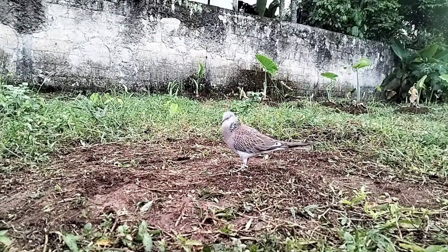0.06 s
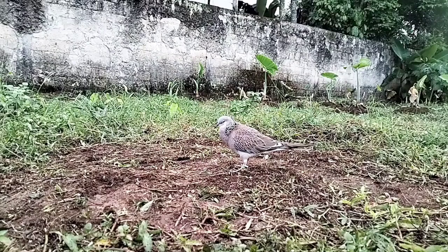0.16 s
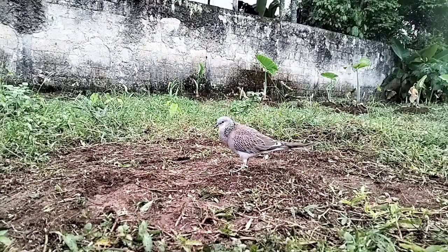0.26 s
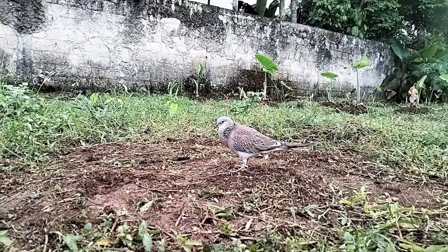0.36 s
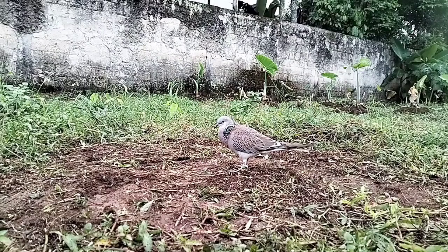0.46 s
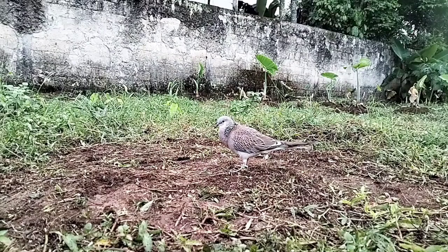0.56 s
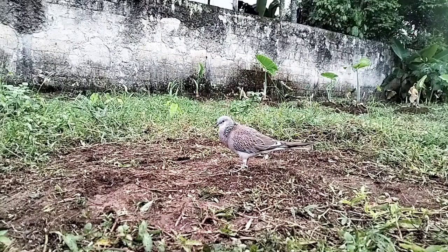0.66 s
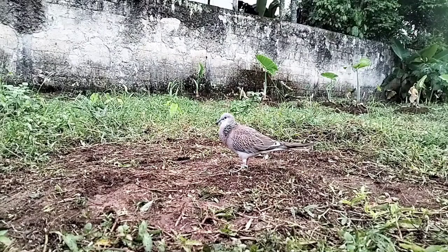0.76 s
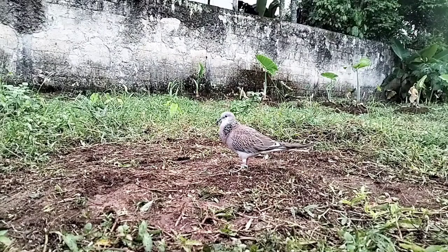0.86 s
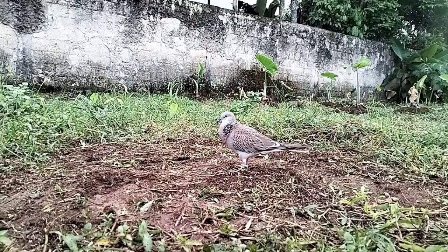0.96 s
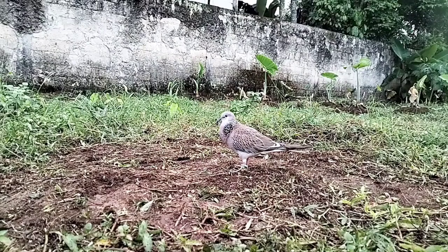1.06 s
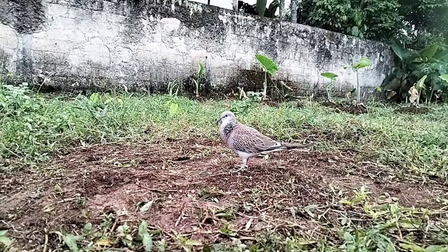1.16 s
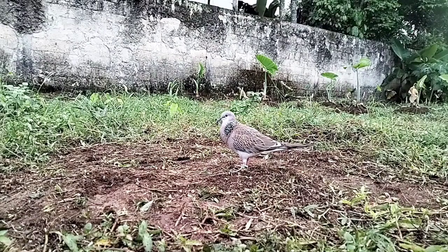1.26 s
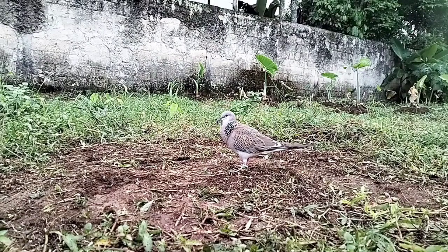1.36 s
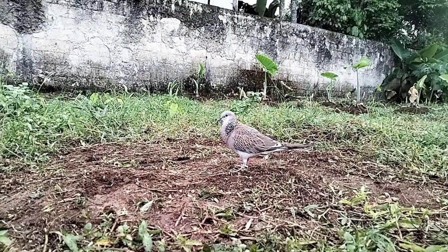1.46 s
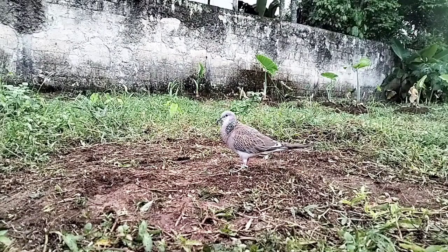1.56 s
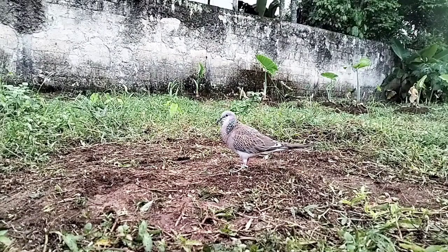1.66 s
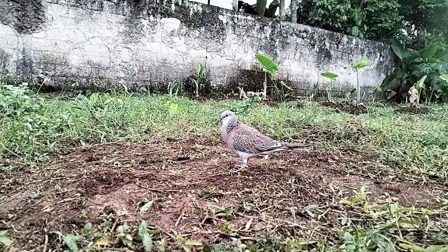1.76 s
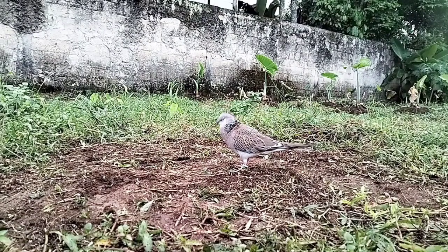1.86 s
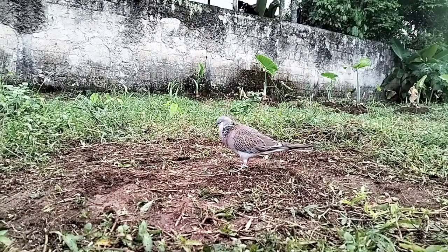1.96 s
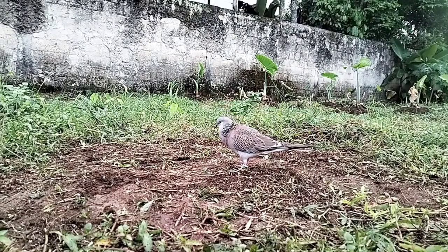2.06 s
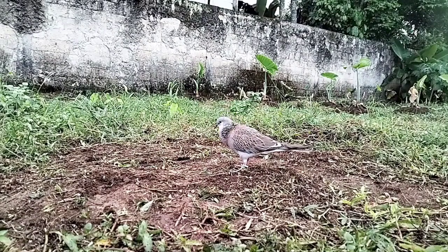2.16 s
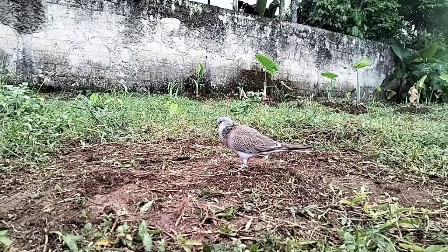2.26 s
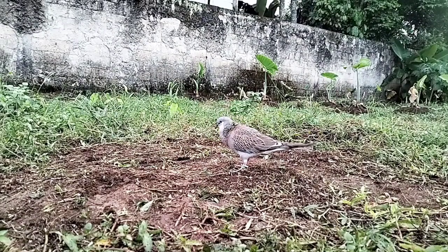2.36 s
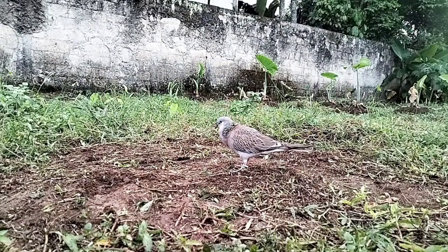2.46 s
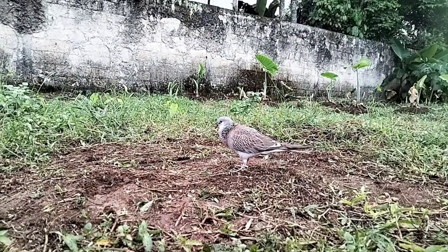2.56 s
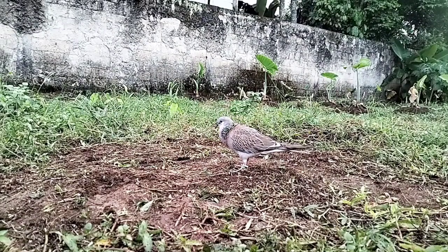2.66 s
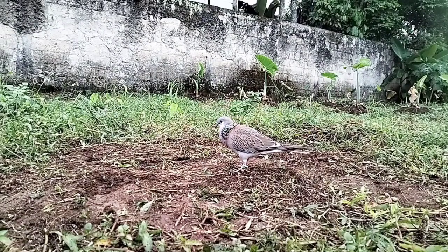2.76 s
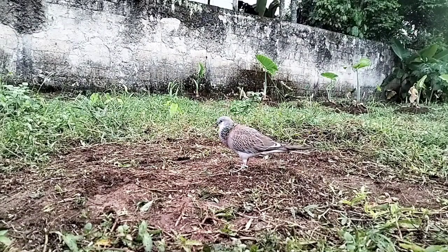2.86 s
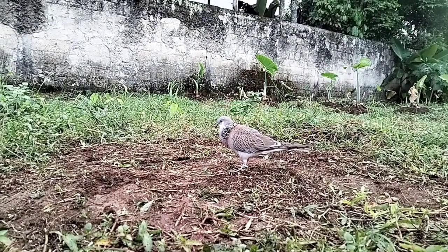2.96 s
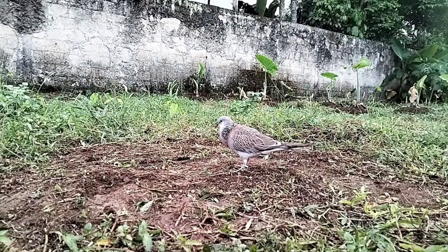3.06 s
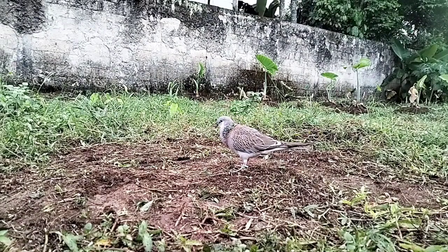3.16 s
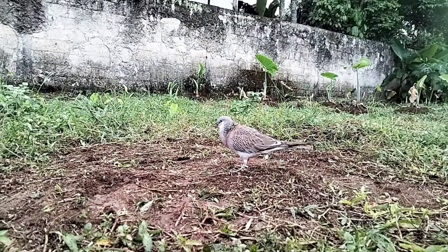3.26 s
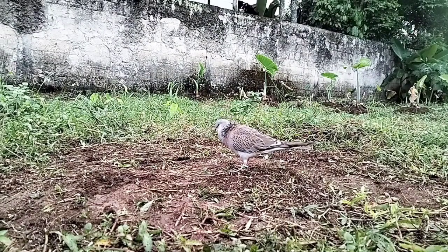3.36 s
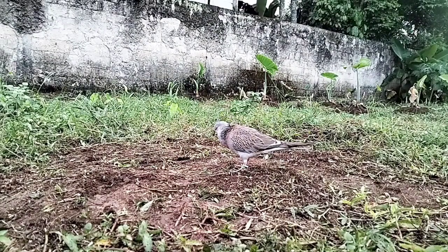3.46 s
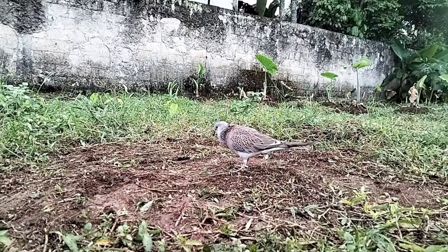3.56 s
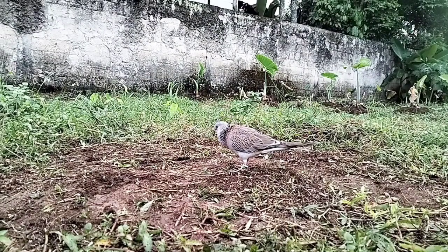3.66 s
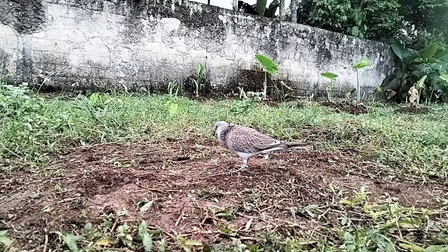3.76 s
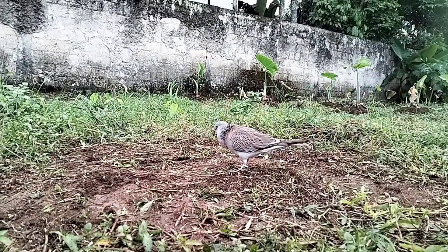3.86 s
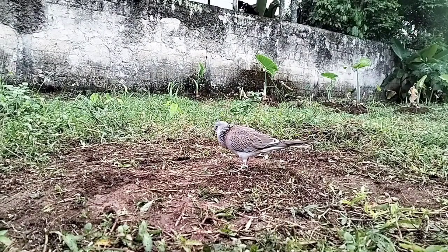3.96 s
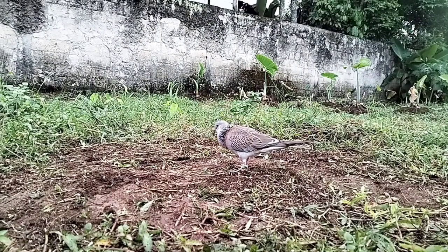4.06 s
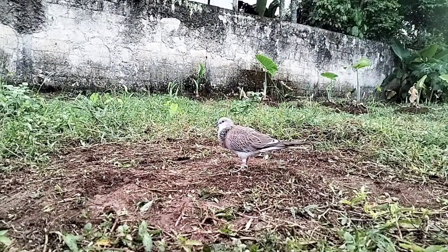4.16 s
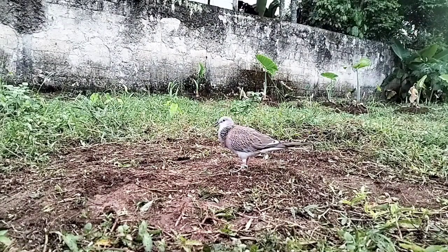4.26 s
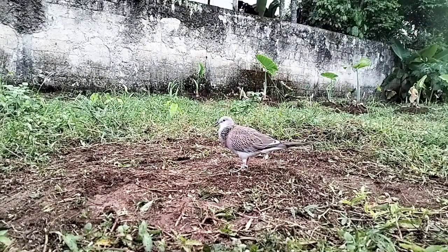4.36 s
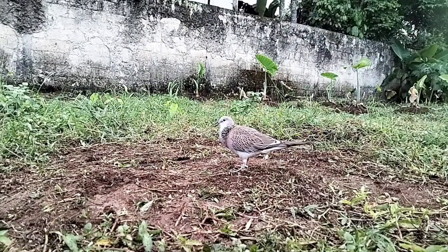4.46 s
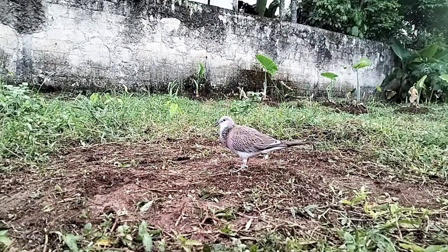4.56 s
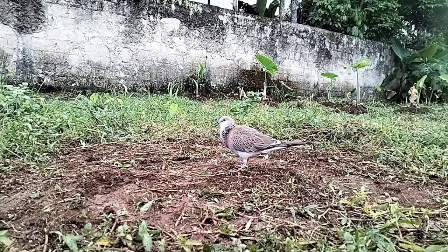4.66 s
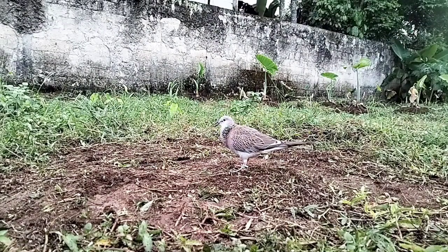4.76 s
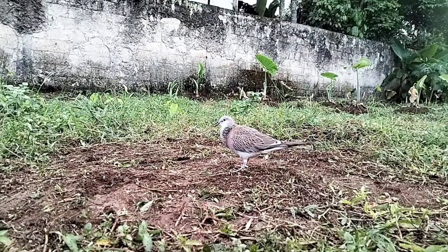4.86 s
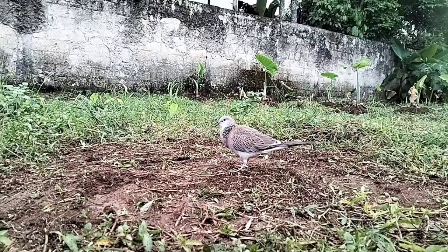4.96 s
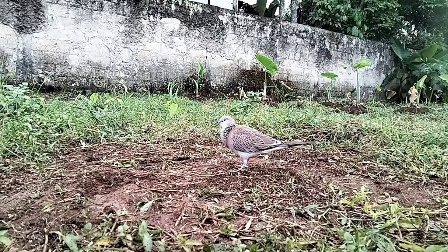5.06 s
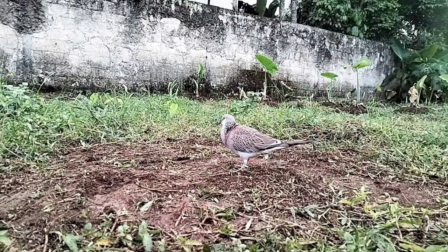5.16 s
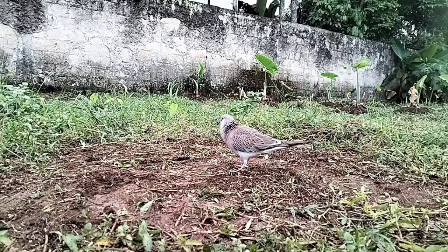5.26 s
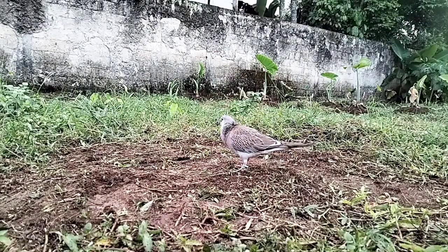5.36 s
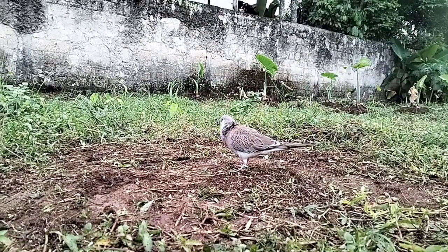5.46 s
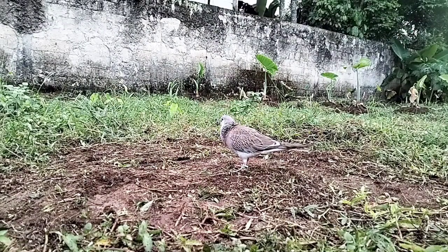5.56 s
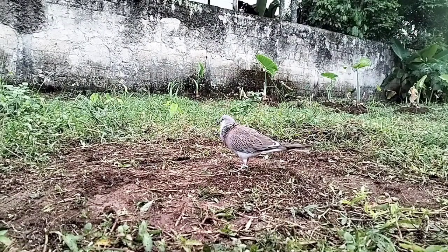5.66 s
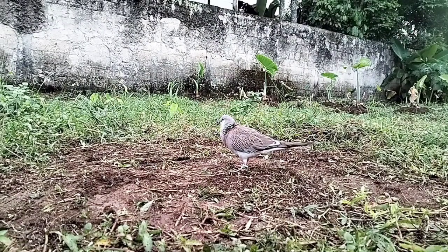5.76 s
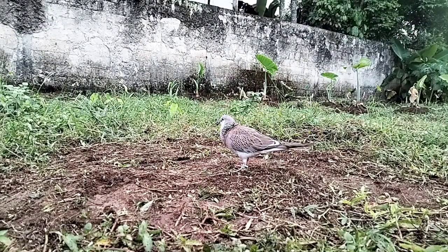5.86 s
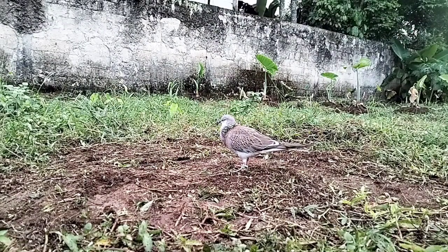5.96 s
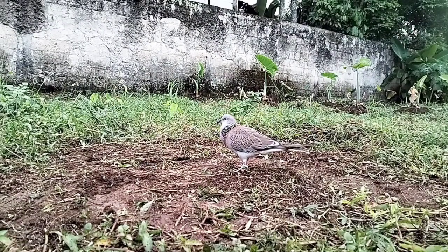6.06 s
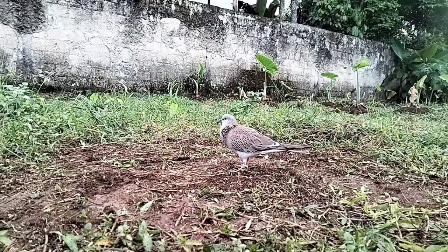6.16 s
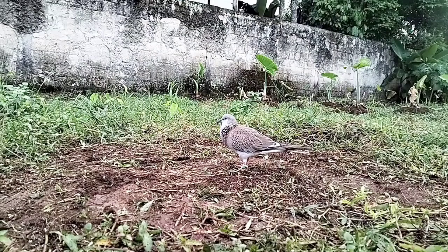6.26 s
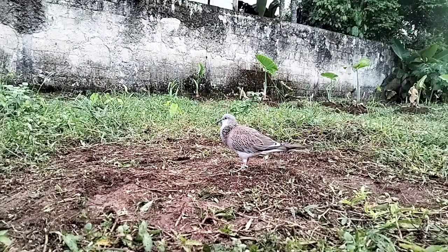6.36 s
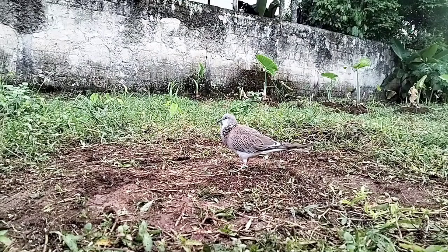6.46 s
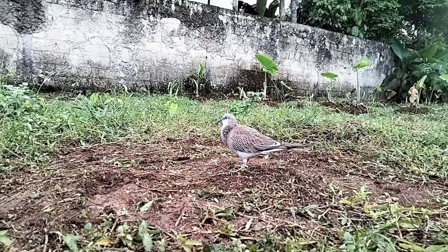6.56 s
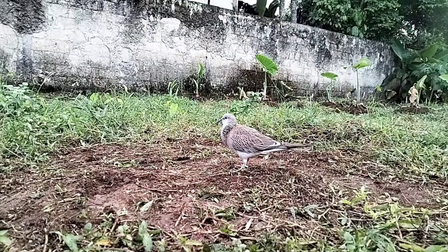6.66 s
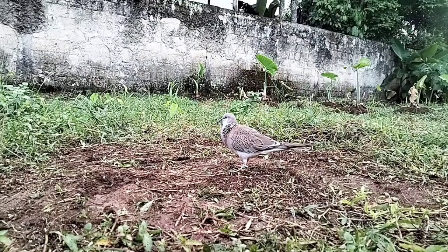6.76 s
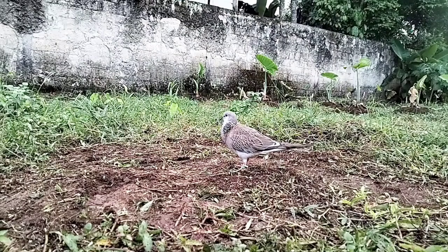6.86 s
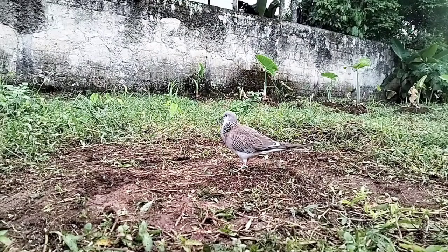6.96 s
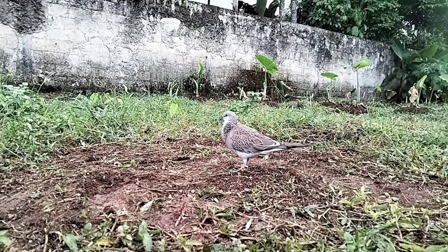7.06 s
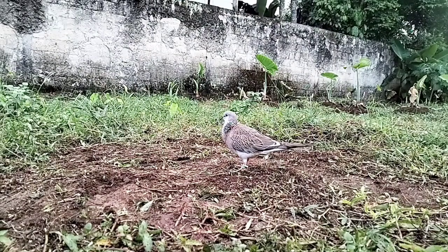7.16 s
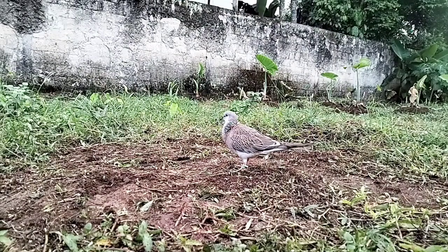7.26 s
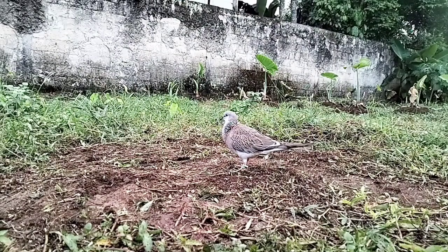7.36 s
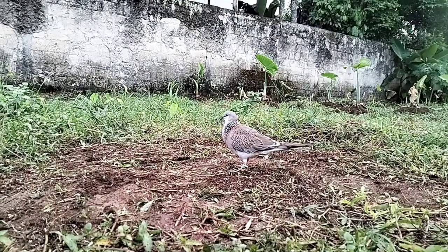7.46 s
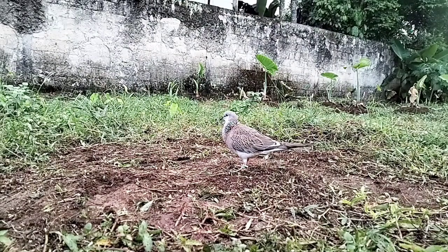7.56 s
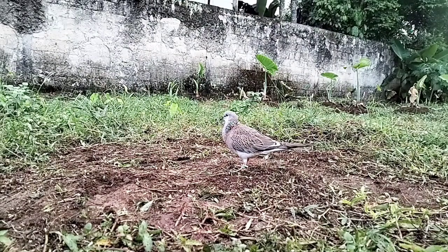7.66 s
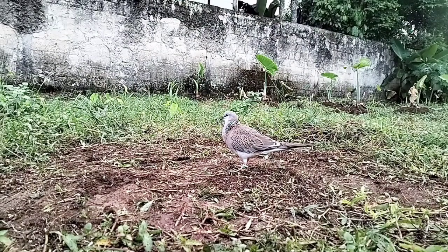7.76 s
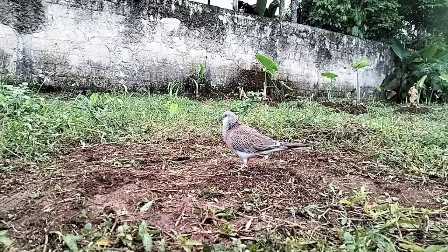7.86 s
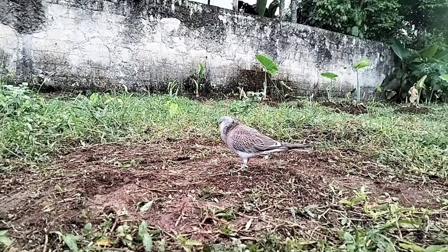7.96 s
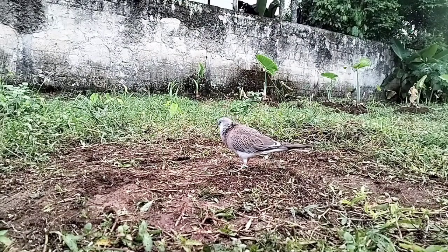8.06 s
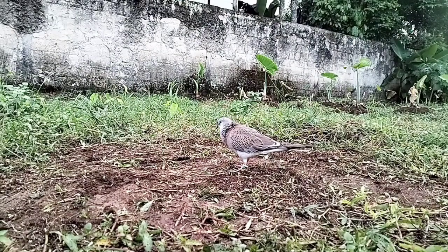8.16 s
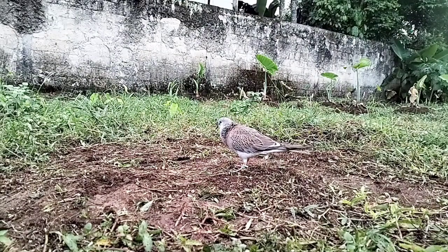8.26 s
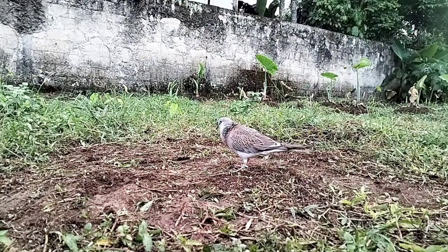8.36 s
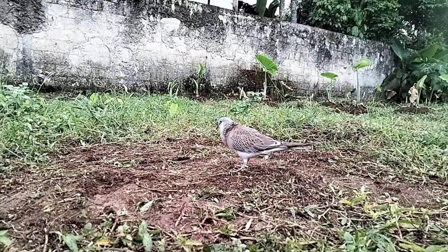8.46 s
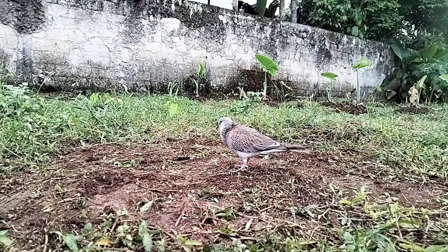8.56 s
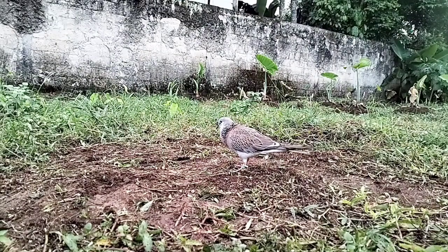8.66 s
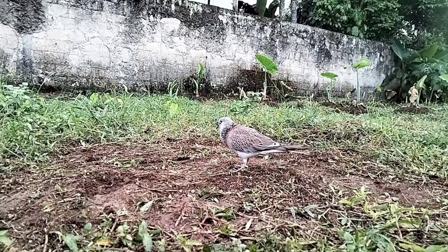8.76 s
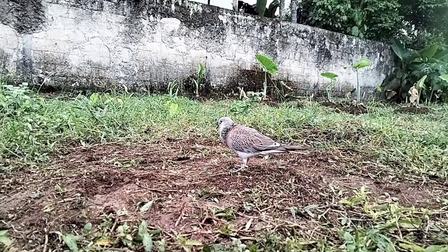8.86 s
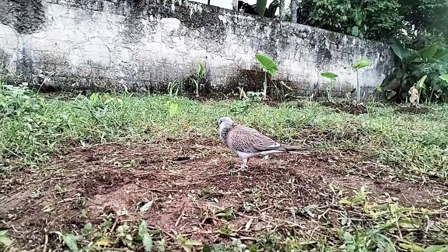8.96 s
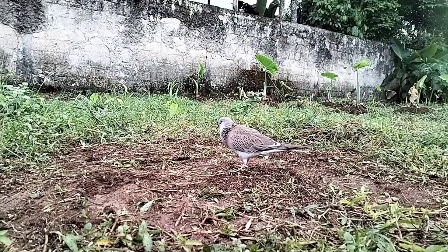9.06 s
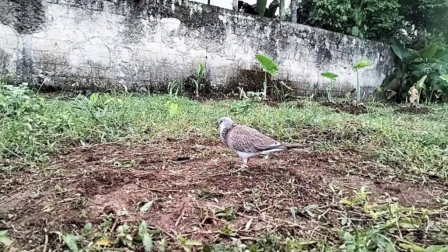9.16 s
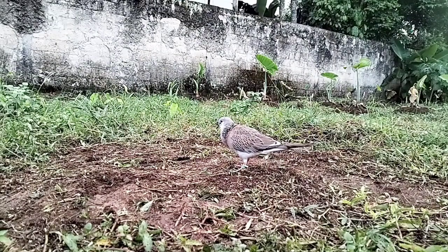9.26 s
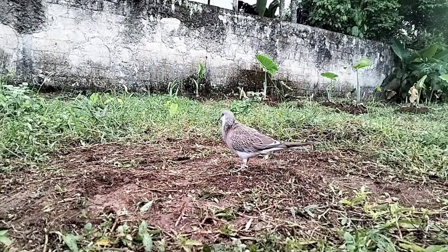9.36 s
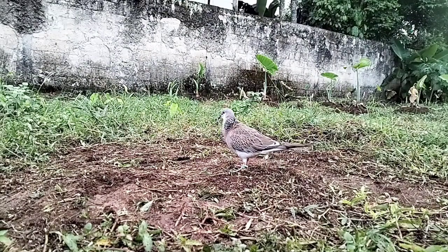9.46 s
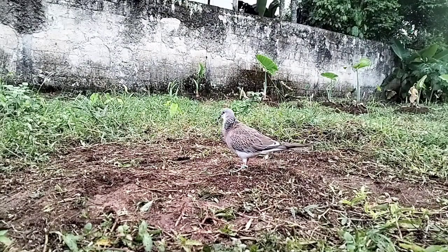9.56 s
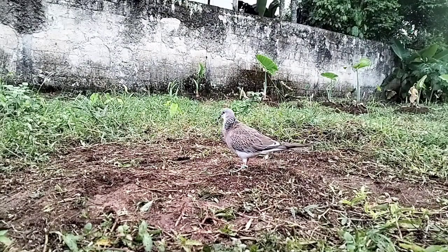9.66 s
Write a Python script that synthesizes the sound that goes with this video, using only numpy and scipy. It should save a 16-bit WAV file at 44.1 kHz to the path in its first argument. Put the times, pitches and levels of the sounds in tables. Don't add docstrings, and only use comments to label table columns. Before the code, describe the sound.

Outdoors by a garden wall, one near dove repeats a mellow, flute-like coo, short then higher and rising, followed by a pulsing purr that drops in pitch. Quieter, slightly higher doves overlap and fill the gaps. Underneath are thin chirps, faint cricket buzzes, tiny litter snaps, leaf hiss and steady far traffic and engine hum. The dove stays close and dry, with only slight outdoor echo.

```python
import sys
import numpy as np
from scipy import signal
from scipy.io import wavfile
from scipy.ndimage import uniform_filter1d, minimum_filter1d

SR = 44100
rng = np.random.default_rng(int(sys.argv[2]) if len(sys.argv) > 2 else 0)


def gain_from_db(level_db):
    decades = np.asarray(level_db, float) / 20
    return 10 ** decades


def waveform_to_disk(signal):
    frames = np.transpose(np.atleast_2d(signal))
    scaled = np.clip(frames, -1, 1) * 32767
    samples = np.round(scaled).astype(np.int16)
    wavfile.write(sys.argv[1], SR, samples)


N = 427769
TIME = np.arange(N) / SR

# length_share, pitch_ratio (re top), level_db (re top)
SHORT_FORM = [(0, .68, -22), (.1, .8, -12), (.22, .95, -4), (.36, 1, 0), (.5, .98, -1), (.65, .92, -6),
              (.82, .84, -14), (1, .74, -24)]
RISING_FORM = [(0, .69, -29), (.15, .745, -20), (.3, .82, -13.5), (.43, .895, -6), (.54, .96, -.7),
               (.68, 1, 0), (.93, .995, 0), (.975, .93, -3), (1, .72, -22)]
# start_s, length_s, top_pitch_hz, top_level_db
NEAR_SHORT = [
    (0.087, 0.099, 542, -14),
    (1.891, 0.1, 566, -10),
    (3.374, .098, 566, -9.5),
    (5.292, .11, 543, -13),
    (7.943, 0.081, 578, -9),
]
NEAR_RISING = [
    (0.289, 0.2, 679, -2),
    (2.08, 0.19, 671.5, -1.5),
    (3.57, 0.17, 660.3, -2.5),
    (5.488, .19, 668.3, -1.5),
    (8.129, 0.21, 668, -2.5),
]
# start_s, length_s, peak_db
PUFFS = [
    [(.685, 0.028, -8.5), (.74, 0.032, -6.5), (.783, .01, -15.5), (.796, .024, -5.5), (.83, .024, -4.5),
     (.864, .021, -8.5), (.893, 0.017, -15), (.918, .012, -15.5)],
    [(2.465, .024, -8.5), (2.512, 0.024, -6.5), (2.553, 0.026, -5.5), (2.592, 0.022, -7),
     (2.625, 0.018, -7), (2.653, .013, -7.5), (2.676, 0.012, -10), (2.693, 0.013, -13), (2.712, .01, -13.5)],
    [(3.943, 0.02, -9), (3.99, 0.025, -8), (4.028, .032, -8), (4.07, 0.018, -8.5), (4.098, 0.011, -6),
     (4.12, 0.018, -8), (4.142, 0.0079, -9), (4.16, 0.0062, -8)],
    [(5.875, 0.024, -9.5), (5.927, 0.018, -7.5), (5.96, 0.0066, -4), (5.971, .02, -7.5), (6.002, 0.016, -7),
     (6.031, 0.014, -7), (6.056, 0.012, -7.5), (6.079, 0.011, -7.5), (6.098, 0.01, -9),
     (6.115, 0.0077, -13)],
    [(8.528, .023, -8.5), (8.577, 0.023, -7), (8.612, 0.023, -7), (8.647, 0.012, -7), (8.668, .015, -7),
     (8.693, .017, -7), (8.719, .013, -10.5), (8.74, 0.011, -7.5), (8.758, 0.0063, -11),
     (8.777, 0.0052, -10)],
]
# first_puff_s, last_puff_s, first_puff_db, trill_top_hz, fall_lateness (power)
ROLLS = [
    (0.94, 1.031, -18.5, 731, 1),
    (2.729, 2.83, -17, 719.4, .94),
    (4.177, 4.301, -10.5, 705, 1.41),
    (6.133, 6.259, -13.5, 713, .95),
    (8.792, 8.951, -13.5, 721, 0.91),
]
ROLL_PUFFS, OVERTONES = [5, 7, 9, 9, 11], [7, 7, 8, 7, 7]
# level of that overtone at the top, overtone_db
OVERTONE_DB = [-49, -64, -51, -50, -60]
TRILL_FALL = [(0, .985), (0.141, 1.0), (0.449, 0.93), (.7, 0.783), (1, 0.64)]
# centre_hz, width_hz, level_db
WINDPIPE = [(3460, 120, -60.5), (5340, 70, -56.5)]
OCTAVE_DB = -53
THROB_PER_S = 56
SADDLE_DB = 4.5
ROLL_END_DB, ROLL_FADE_POWER = -28, 1.045
ROLL_OPEN_SHARE, ROLL_HURRY = 0.6, .06
ROLL_JITTER_S, ROLL_JITTER_DB = 0.002, 2.0

# length_share, pitch_ratio, level_db
ARCHED_FORM = [(0, .72, -17), (.3, .83, -7), (.5, .96, -2), (.65, 1, 0), (.8, .985, 0), (.9, .93, -1.5),
               (.96, .84, -6), (1, .7, -23)]
# start_s, length_s, top_pitch_hz, top_level_db
FAR_SHORT = [(.55, 0.13, 656, -46), (1.43, 0.1, 699, -24), (3.21, 0.11, 684, -27), (5.3, 0.075, 686, -22.5),
             (6.62, 0.083, 632, -32), (6.79, 0.097, 697, -24), (9.15, 0.093, 624, -30),
             (9.6, 0.13, 691, -32.5)]
FAR_RISING = [(1.04, .18, 782, -28.5), (1.61, 0.15, 774, -18.5), (1.76, 0.09, 734, -23.5),
              (3.41, 0.17, 814, -30), (3.82, 0.16, 772, -27), (4.16, 0.13, 777, -17),
              (5.45, 0.087, 791, -29.5), (5.66, 0.17, 830, -29.5), (6.33, 0.1186, 723, -27),
              (6.87, 0.16, 731, -26.5), (6.985, 0.13, 775, -18), (8.14, 0.1, 807, -31),
              (9.39, 0.2, 736, -26.5)]
# start_s, length_s, top_pitch_hz, last_pitch_hz, level_db
FAR_TRILLS = [
    (1.329, .39, 764, 703, -33.5),
    (1.965, 0.41, 750, 584, -22.5),
    (3.739, 0.1, 758, 682, -30),
    (4.31, 0.19, 753, 740, -23.5),
    (4.485, 0.38, 734.4, 556, -22.5),
    (6.201, 0.22, 719.4, 680, -30),
    (7.235, 0.116, 771, 752, -23.5),
    (7.35, 0.42, 753, 533, -22),
    (8.362, 0.64, 760, 679, -34),
]
HIGH_TRILLS = [
    (0, 0.38, 802, 686, -28.5),
    (2.423, 0.46, 815.8, 712, -31),
    (4.69, .45, 804, 614, -28.5),
    (7.607, 0.44, 797, 673, -27),
]
FAR_FALL_POWER, FAR_MELT_SHARE = 2.2, .9
FAR_LOUDEST_SHARE, FAR_SWELL_DB = .3, 22
FAR_JITTER = .016

# start_s, level_db, pitch_ratio
CHIPS = [(0.826, -39, 0.95), (1.605, -39.5, 0.96), (3.127, -39, 0.94), (3.833, -39, 0.97), (5.8, -42, 0.94),
         (7.89, -40, 0.96), (8.54, -39, 0.96)]
# late_s, length_s, top_pitch_hz, end_drop_hz, top_share (of the length)
STROKES = [
    (.002, 0.015, 3475, 870, 0.34),
    (.03, 0.052, 3770, 1406, .44),
]
# start_s, length_s, first_pitch_hz, last_pitch_hz, level_db
WHISTLE = [(0.575, 0.33, 4410, 4220, -57.5), (1.273, 0.5, 4380, 4170, -64), (2.929, 0.22, 4280, 4350, -60),
           (3.588, 0.33, 4165, 4200, -59), (4.314, 0.14, 4580, 4420, -65), (5.4, 0.12, 4100, 4110, -71),
           (5.602, 0.37, 4190, 4100, -62.5), (7.655, 0.35, 4250, 4280, -61.5),
           (8.184, 0.48, 4270, 4000, -58.5)]
BUZZ_ENDS = [0.724, 1.858, 2.97, 4.1, 5.222, 6.348, 7.48, 8.603, 9.729]
# re_end_s, strokes_per_s, level_db
BUZZ = [(-.57, 185.7, -74), (-.5, 180.5, -68), (-.4, 178.1, -63), (-.2, 166.5, -59.5), (-.005, 155, -59.5),
        (0, 151, -76.5)]
# start_s, peak_db
TICKS = [(0.6585, -67), (0.9198, -47), (1.3877, -52), (2.4095, -73), (2.4424, -59), (2.473, -48),
         (3.2266, -67), (3.3248, -67), (3.3717, -67), (4.072, -54), (5.3497, -58), (5.8279, -54),
         (6.1434, -50), (6.256, -48), (6.5735, -68), (7.2893, -55), (7.4719, -55), (7.8965, -57),
         (8.0541, -63), (8.756, -54), (8.8398, -54), (8.933, -49), (9.1102, -60), (9.2174, -68),
         (9.3147, -66), (9.6205, -66)]
# start_s, length_s, pitch_hz, level_db
DISTANT = [
    (6.1, .17, 1240, -53),
    (6.38, .24, 1020, -49),
    (6.1, .25, 2900, -63),
    (9.3, .39, 128, -25),
    (7.4, .5, 178, -31),
    (8.35, .4, 160, -28),
    (9.0, .3, 167, -29),
    (.5, .15, 1050, -52),
    (3.78, .08, 5050, -65),
    (3.12, .06, 5050, -65),
]

# time_s, firing_rate_hz, level_db
ENGINE = [(0.0, 34.44, -37), (4.51, 32.36, -30.5), (7.559, 34.31, -29.5), (8.938, 40.18, -28),
          (9.7, 39.83, -41)]
# multiple, level_db
ORDERS = [(3, -8.5), (4, -3.5), (5, -1.5), (6, -7.5), (7, -17.5)]
# time_s, pitch_hz, level_db
TRUCK = [(0, 68, -41.5), (2.401, 66, -28.5), (2.801, 64, -41), (3.3, 65, -27.5), (3.8, 63, -38),
         (4.4, 65.5, -29), (6.151, 67, -30.5), (6.5, 66, -38.5), (7.7, 66.5, -33), (9.7, 66, -30.5)]
# band_hz, level_db (per Hz)
RUMBLE = [(13, -42), (22, -7), (70, 2.5), (157, 4.5), (182, -5), (266, -8), (395, -14.5), (554, -18.5),
          (669, -20.5), (708, -17.5), (856, -26), (1270, -32.5), (2000, -62.5), (2600, -85), (4400, -120)]
# time_s, level_db
TRAFFIC = [(0, -9.5), (1.3, -1.5), (2.5, 5.5), (3.5, -1.8), (4.56, 0), (5.1, 1), (5.8, 0.5), (8.3, -2),
           (9.7, -4.5)]
DEEP_DB, UPPER_DB, UPPER_FOLLOWS = -28, -26, 0.28
# band_hz, level_db (per Hz)
RUSTLE = [(1060, -29), (1800, -16), (2140, -7.5), (2900, 0.5), (4100, -0.5), (4750, -8.5), (6500, -13.5),
          (8800, -20), (11500, -30), (15700, -25)]
# time_s, level_db
BREEZE = [(0, -52), (0.701, -58), (1.2, -50.5), (2.619, -52), (4.3, -57), (5.75, -52.5), (6.5, -55),
          (8.2, -57), (9.7, -57.5)]
# centre_hz, width_hz, level_db
CHORUS = [(7415, 830, -65.5), (10200, 1100, -67.5)]
# centre_s, half_width_s
DROPOUTS = [(.558, .006), (.577, .003), (.63, .005), (.652, .006), (6.7, .008)]
# delay_s, level_db
ECHOES = [(.006, -25.5), (.013, -9.5), (.031, -17.5), (.058, -21), (.094, -31)]


def drift(rate):
    r = np.exp(-2 * np.pi * rate / SR)
    slow = signal.lfilter([1], [1, -2 * r, r * r], rng.standard_normal(N + SR))[SR:]
    return slow / slow.std()


def add(out, start_s, sound):
    at = round(start_s * SR)
    out[at:at + len(sound)] += sound[:max(N - at, 0)]


def played(rows, fade_s):
    s, *columns = np.transpose(rows)
    t = np.arange(s[0], s[-1], 1 / SR)
    to_end_s = np.minimum(t - s[0], s[-1] - t)
    fade = np.sin(np.pi / 2 * np.clip(to_end_s / fade_s, 0, 1)) ** 2
    return t, fade, [np.interp(t, s, c) for c in columns]


def phase(hz):
    return 2 * np.pi * np.cumsum(hz) / SR


def follow(rows):
    s, *columns = np.transpose(rows)
    return [np.interp(TIME, s, c) for c in columns]


def echoed(x, wet_db):
    out = x.copy()
    for delay_s, level_db in ECHOES:
        add(out, delay_s, gain_from_db(level_db + wet_db) * x)
    return out


def scattered(x, wet_db, t60):
    t = np.arange(0, t60, 1 / SR)
    tail = rng.standard_normal(len(t)) * gain_from_db(-60 * t / t60)
    tail = tail / np.sqrt(np.sum(tail ** 2))
    return x + gain_from_db(wet_db) * signal.fftconvolve(x, tail)[:N]


def coo(hz, gain, octave_db=OCTAVE_DB, windpipe=WINDPIPE):
    turn = phase(hz)
    high = 0
    for centre_hz, width_hz, db in windpipe:
        for k in range(4, 10):
            high = high + gain_from_db(db) * np.exp(-((k * hz - centre_hz) / width_hz) ** 2) * np.sin(k * turn)
    octave = gain_from_db(octave_db) * gain ** 0.019 * np.sin(2 * turn)
    return gain * np.sin(turn) + octave + gain ** 2 * high


def dove_notes(form, sung, wobble, flutter_db, octave_db=OCTAVE_DB):
    out = np.zeros(N)
    tremor = .7 * drift(46) + np.sin(phase(THROB_PER_S * (1 + .15 * drift(20))))
    for s, length, top_hz, top_db in sung:
        t, fade, (ratio, db) = played(np.array(form) * [length, 1, 1], 0.0024)
        ratio, db = uniform_filter1d([ratio, db], size=150, mode="nearest")
        softness = np.clip(.03 - db / 15, 0, 1)
        shake = np.roll(tremor, -round(s * SR))[:len(t)] * softness
        hz = top_hz * ratio * (1 + wobble * shake)
        add(out, s, coo(hz, fade * gain_from_db(top_db + db + flutter_db * shake), octave_db))
    return out


def rolled(first_s, last_s, first_db, count):
    share, chance = np.linspace(0, 1, count), rng.standard_normal((count, 2))
    hurried = share + ROLL_HURRY * share * (1 - share)
    s = first_s + (last_s - first_s) * hurried + ROLL_JITTER_S * share * chance[:, 0]
    db = first_db + (ROLL_END_DB - first_db) * share ** ROLL_FADE_POWER
    db = db + ROLL_JITTER_DB * share * chance[:, 1]
    return list(zip(s, ROLL_OPEN_SHARE * np.gradient(s), db))


def near_trill(edge_s=0.009, sag=.34, flat=.45, ripple_db=0.3):
    out, ripple = np.zeros(N), drift(36)
    for slow, roll, count, k, overtone_db in zip(PUFFS, ROLLS, ROLL_PUFFS, OVERTONES, OVERTONE_DB):
        first_s, last_s, first_db, top_hz, late = roll
        start = slow[0][0]
        for s, length, peak_db in slow + rolled(first_s, last_s, first_db, count):
            t = np.arange(0, length + edge_s, 1 / SR)
            share = t / t[-1]
            edges = np.sin(np.pi / 2 * np.clip(np.minimum(t, t[-1] - t) / edge_s, 0, 1)) ** 2
            saddle_db = SADDLE_DB * (s > start) * np.clip(length / .016 - .6, 0, 1)
            saddle_db = saddle_db * np.sin(np.pi * share ** .85) ** 4
            gain = edges * gain_from_db(peak_db + 5.5 - saddle_db + ripple_db * ripple[round(s * SR):][:len(t)])
            fallen = ((s - start) / (last_s - start)) ** late
            held_hz = top_hz * np.interp(fallen, *np.transpose(TRILL_FALL))
            arch = np.abs(np.sin(np.pi * share ** 0.92)) ** flat
            hz = held_hz * (1 + sag * (arch - .95))
            overtone = gain_from_db(overtone_db + 4) * gain ** 3 * (held_hz / top_hz) ** 12
            overtone = overtone * np.sin(k * phase(.8 * held_hz + .2 * hz))
            add(out, s - edge_s / 2, coo(hz, gain, windpipe=WINDPIPE[:1]) + overtone)
    return out


def near_dove():
    song = dove_notes(SHORT_FORM, NEAR_SHORT, wobble=0.025, flutter_db=4, octave_db=-50)
    song += dove_notes(RISING_FORM, NEAR_RISING, wobble=.025, flutter_db=3)
    song += near_trill()
    return scattered(echoed(song, wet_db=-12), wet_db=-25, t60=0.5)


def far_trills(sung, puffs_per_s, rise, depth=1.6):
    out, uneven, loud = np.zeros(N), drift(25), drift(25)
    for s, length, top_hz, last_hz, db in sung:
        t, fade, (share,) = played([(s, 0), (s + length, 1)], 0.0026)
        at = slice(round(s * SR), round(s * SR) + len(t))
        hz = top_hz + (last_hz - top_hz) * share ** FAR_FALL_POWER
        cycle = np.cumsum(puffs_per_s * (1 + .17 * uneven[at])) / SR % 1
        puffed = np.clip((FAR_MELT_SHARE - share) / .25, .12, 1)
        swell_db = -FAR_SWELL_DB * (share - FAR_LOUDEST_SHARE) ** 2
        puffs = np.sin(np.pi * cycle) ** (depth * puffed)
        gain = fade * gain_from_db(db + 3 * puffed + swell_db + 1.8 * loud[at]) * puffs
        glide = rise * puffed * (2 * cycle - 1) + FAR_JITTER * puffed * loud[at][::-1]
        add(out, s, gain * np.sin(phase(hz * (1 + glide))))
    return out


def far_doves():
    sung = dove_notes(SHORT_FORM, FAR_SHORT, wobble=0.016, flutter_db=2.0, octave_db=-71.5)
    sung += dove_notes(ARCHED_FORM, FAR_RISING, wobble=.015, flutter_db=3.0, octave_db=-70.5)
    trills = far_trills(FAR_TRILLS, 58, .065) + far_trills(HIGH_TRILLS, 72, .15)
    return scattered(sung, wet_db=-15, t60=.35) + scattered(trills, wet_db=-5, t60=.25)


def small_bird():
    out = np.zeros(N)
    for late_s, length, top_hz, drop_hz, top_share in STROKES:
        t, fade, (share,) = played([(0, 0), (length, 1)], 0.2 * length)
        side = np.where(share < top_share, max(top_share, .45), 1 - top_share)
        hz = top_hz - drop_hz * np.abs((share - top_share) / side) ** 1.7
        for s, level_db, ratio in CHIPS:
            add(out, s + late_s, fade * gain_from_db(level_db - 3.0) * np.sin(phase(hz * ratio)))
    return out


def whistling_insect(strokes_per_s=85, depth=0.45, swell_db=22):
    out, waver = np.zeros(N), drift(40)
    for s, length, first_hz, last_hz, db in WHISTLE:
        t, fade, (hz, share) = played([(s, first_hz, 0), (s + length, last_hz, 1)], 0.012)
        shake = waver[round(t[0] * SR):][:len(t)]
        throb = 1 + depth * np.sin(phase(strokes_per_s * (1 + 0.27 * shake[::-1])))
        level_db = db + 3.5 - swell_db * (share - .47) ** 2 + 5 * np.minimum(shake, 1)
        tone = np.sin(phase(hz * (1 + 0.005 * shake[::-1])))
        add(out, s, fade * gain_from_db(level_db) * throb * tone)
    return out


def cricket(top_hz=7740, fall_hz=500, sharp=3.9):
    out, uneven = np.zeros(N), drift(120)
    t, fade, (per_s, db) = played(BUZZ, .002)
    stroke = np.cumsum(per_s) / SR % 1
    for end_s in BUZZ_ENDS:
        shake = np.roll(uneven, round(end_s * SR))[:len(t)]
        turn = phase(top_hz - fall_hz * stroke + 50 * shake)
        tone = np.sin(turn) + gain_from_db(-27) * np.sin(2 * turn)
        gain = gain_from_db(db + 12.5 + 0.7 * shake[::-1]) * np.sin(np.pi * stroke) ** sharp
        add(out, end_s + t[0], gain * tone)
    return out


def litter():
    out, t = np.zeros(N), np.arange(0, .006, 1 / SR)
    bursts = rng.standard_normal((len(TICKS), len(t)))
    for (s, peak_db), burst in zip(TICKS, bursts):
        snap = burst / np.abs(burst[:40]).max() * np.exp(-t / .0015)
        add(out, s, gain_from_db(peak_db + 13) * snap)
    bright = signal.butter(2, 5000, "high", fs=SR, output="sos")
    return signal.sosfilt(bright, echoed(out, wet_db=-8))


def distant_calls():
    out, waver = np.zeros(N), drift(35)
    for s, length, hz, db in DISTANT:
        t, fade, _ = played([(0, 0), (length, 0)], 0.014)
        shake = waver[round(s * SR):][:len(t)]
        tone = np.sin(phase(hz * (1 + 0.02 * shake)))
        add(out, s, fade * gain_from_db(db + 5.3 * shake[::-1]) * tone)
    return out


def far_engine(swell_db=3.0):
    firing_hz, level_db = follow(ENGINE)
    turn, swell = phase(firing_hz * (1 + .006 * drift(3))), drift(1.7)
    orders = 0
    for k, order_db in ORDERS:
        orders = orders + gain_from_db(order_db + swell_db * np.roll(swell, int(k) * SR)) * np.sin(k * turn)
    return gain_from_db(level_db) * orders


def parked_truck():
    hz, level_db = follow(TRUCK)
    gain = gain_from_db(level_db + 3 + 1.5 * drift(4))
    return gain * np.sin(phase(hz + 1.2 * drift(2.5)))


def coloured(spectrum, patchy_db, per_octave):
    hz, level_db = np.transpose(spectrum)
    edges = np.geomspace(hz[0], hz[-1], int(per_octave * np.log2(hz[-1] / hz[0])))
    white, flicker, out = rng.standard_normal((2, N)), drift(9), 0
    for k, (low, high) in enumerate(zip(edges, edges[1:])):
        band_pass = signal.butter(2, [low, high], "band", fs=SR, output="sos")
        band = signal.sosfilt(band_pass, white[k % 2])
        centre_db = np.interp(np.log(low * high) / 2, np.log(hz), level_db)
        out = out + band * gain_from_db(centre_db + patchy_db * np.roll(flicker, k * SR // 3))
    return out / out.std()


def town_rumble():
    traffic_db, = follow(TRAFFIC)
    rumble = coloured(RUMBLE, patchy_db=1.97, per_octave=3)
    deep = signal.sosfilt(signal.butter(2, 105, fs=SR, output="sos"), rumble)
    upper = rumble - deep
    return gain_from_db(DEEP_DB + traffic_db) * deep + gain_from_db(UPPER_DB + UPPER_FOLLOWS * traffic_db) * upper


def leaves():
    breeze_db, = follow(BREEZE)
    return gain_from_db(breeze_db - 2.5) * coloured(RUSTLE, patchy_db=0.0, per_octave=6.4)


def insect_chorus():
    out = 0
    for hz, width_hz, db in CHORUS:
        r = np.exp(-np.pi * width_hz / SR)
        poles = [1, -2 * r * np.cos(2 * np.pi * hz / SR), r * r]
        band = signal.lfilter([1], np.convolve(poles, poles), rng.standard_normal(N))
        out = out + gain_from_db(db + 1.2 * drift(15)) * band / band.std()
    return out


def scene():
    ducked_db = sum(-12 * np.exp(-((TIME - s) / half_s) ** 2) for s, half_s in DROPOUTS)
    lulls_db = ducked_db + 1.1 * drift(13) - 6 * np.maximum(drift(30) - 1.5, 0)
    doves = near_dove() + far_doves()
    small = small_bird() + whistling_insect() + distant_calls()
    small = scattered(echoed(small, wet_db=-4.0), wet_db=-11.5, t60=0.25)
    ground = gain_from_db(ducked_db) * cricket() + litter()
    engines = far_engine() + parked_truck()
    air = town_rumble() + gain_from_db(lulls_db) * (leaves() + insect_chorus())
    return (doves + small + ground + engines + air)[None]


def low_pass(x):
    return signal.sosfilt(signal.butter(12, 16320, fs=SR, output="sos"), x)


def record(dry):
    reach = -minimum_filter1d(-np.abs(dry), size=221)
    gain = uniform_filter1d(np.minimum(1, .88 / (reach + 1e-9)), size=221)
    fade = np.clip((TIME[-1] - TIME) / .012, 0, 1)
    top_cut = signal.ellip(10, .5, 60, 15720, fs=SR, output="sos")
    mix = signal.sosfilt(top_cut, dry * gain * fade)
    return low_pass(mix)


dry = scene()
out = record(dry)
waveform_to_disk(out)
```